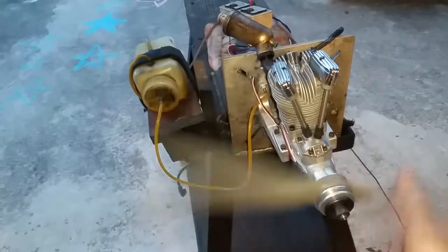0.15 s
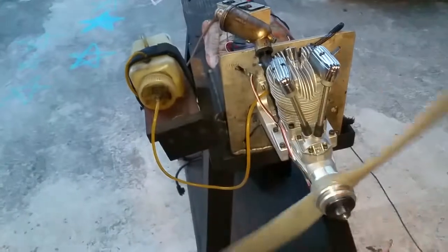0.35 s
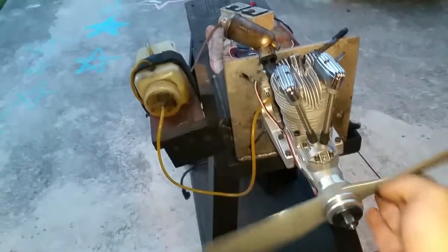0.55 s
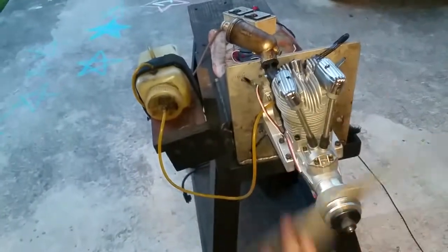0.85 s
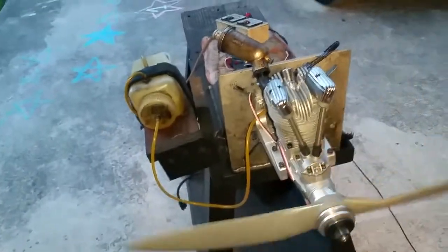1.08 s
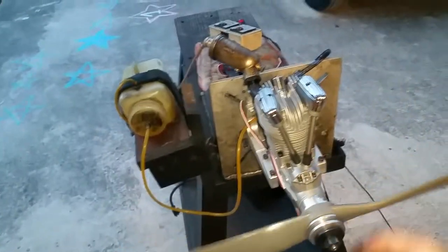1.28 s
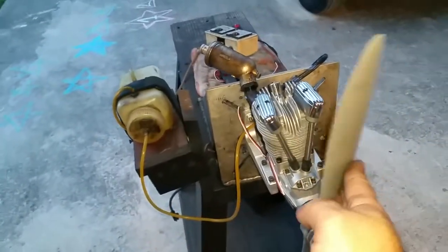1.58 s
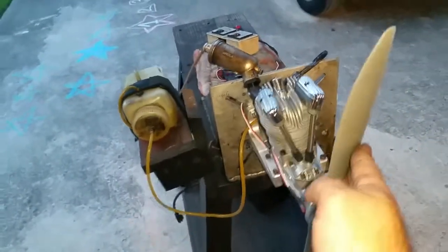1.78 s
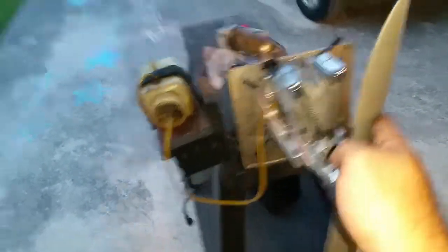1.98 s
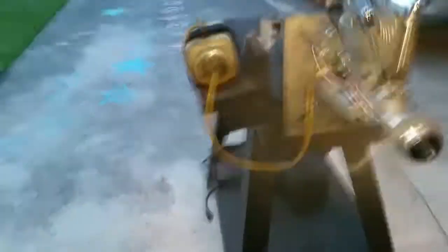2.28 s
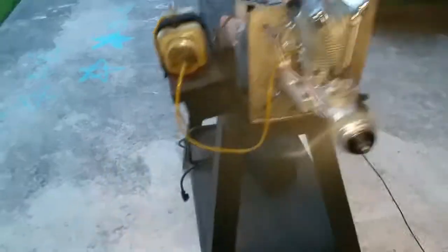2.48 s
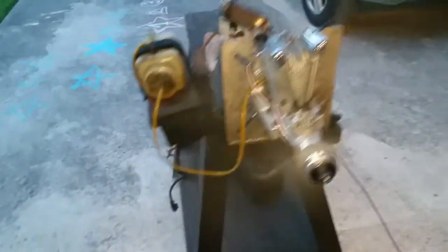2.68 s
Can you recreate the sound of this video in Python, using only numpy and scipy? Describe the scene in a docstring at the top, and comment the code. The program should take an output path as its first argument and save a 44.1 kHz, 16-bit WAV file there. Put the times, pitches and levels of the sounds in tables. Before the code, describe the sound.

A small four-stroke petrol engine, close, over soft low rumble and hiss. Hand turning gives airy wheezes at 0.27, 0.9 and 1.5 seconds, light clicks around 0.5, 0.9, 1.55 and 1.75, and a hollow knock near 1.04. After a short gulp at 2.14, it catches at 2.19: harsh, loud barks about fifteen per second, slightly uneven, with metallic clatter, propeller throb and short hard echoes to the end.

```python
"""Low rumble and hiss come first, then wheezes and clicks as a small four-stroke petrol engine for a model
aircraft is turned slowly by hand, close by: band-filtered noise under slow swells and short decays.
The engine then catches and idles unevenly. Each firing is a pressure pulse (crack), filtered noise (bark and
gas jet) and damped sines (exhaust thump, ringing metal), over rattling noise, valve taps and the throb of
the two-bladed propeller, a sinusoid locked to the engine cycle."""
import sys
import numpy as np
from scipy import signal
from scipy.fft import rfft, irfft
from scipy.io import wavfile
from scipy.ndimage import uniform_filter1d

SR = 44100
rng = np.random.default_rng(int(sys.argv[2]) if len(sys.argv) > 2 else 0)


def wav_record(signal):
    """Record a signal, one row per channel, as 16-bit PCM in the file named by sys.argv[1]."""
    frames = np.transpose(np.atleast_2d(signal))
    bounded = np.clip(frames, -1, 1)
    # unit amplitude maps onto the largest positive 16-bit level
    quanta = np.round(bounded * 32767).astype(np.int16)
    wavfile.write(sys.argv[1], SR, quanta)


N = 125685
T = np.arange(N) / SR
HZ = np.fft.rfftfreq(2 * N, 1 / SR)

# spectrum of the background rumble and hiss: pitch_hz, level_db
FLOOR_SPECTRUM = [(15, -33), (25, -15), (87, -3.5), (108, -3), (120, -7.5), (153, -3), (175, -8),
                  (236, -18), (256, -17.5), (309, -11.5), (451, -24), (1020, -25), (1560, -29.5),
                  (4250, -39), (8140, -15.5), (11000, -14), (16000, -37)]
FLOOR_DB = -48
# left-right correlation of the background: pitch_hz, correlation (1 = identical)
FLOOR_CORRELATION = [(30, 1), (300, 0.93), (1500, 0), (5000, 0), (16000, 0)]
# left-right correlation of the near sources: pitch_hz, correlation (1 = identical)
NEAR_CORRELATION = [(40, 0.45), (70, 0), (130, 0.93), (400, 0.99), (800, 0.88), (1500, 0.55), (2800, 0.21),
                    (5000, 0), (16000, 0)]
# balance of the engine: pitch_hz, left_minus_right_db
ENGINE_BALANCE = [(100, 2), (380, -1), (700, 1.5), (1300, 3.5), (2400, 4), (4400, -1.5), (6500, -2),
                  (9000, 3), (15000, -2.5)]
# balance of the wheezes and clicks: pitch_hz, left_minus_right_db
WHEEZE_BALANCE = [(60, 5), (150, 8), (380, -6.5), (950, 3.5), (2380, 6), (5980, -2.5), (15000, -1.0)]

# the hand shifts its grip on the propeller
GRIP_AT_S, GRIP_S, GRIP_DB, GRIP_HZ = 1.55, 0.23, -59.5, 230

# air wheezing through the turned engine: start_s, peak_s, level_db, rise_s, fall_s, tilt_db_per_octave
WHEEZES = [(0.102, 0.186, -48.5, 0.09, 0.037, -7), (0.224, 0.269, -32, 0.028, 0.053, -2),
           (0.313, 0.385, -55, 0.11, 0.089, -8.5), (0.671, 0.877, -44, 0.14, 0.037, -8),
           (.915, 0.953, -37.5, .014, 0.021, -3.5), (0.997, 1.054, -43.5, 0.03, 0.029, -8.5),
           (1.453, 1.509, -46, 0.021, 0.049, -5)]
# spectrum of the wheezes before tilting: pitch_hz, level_db
WHEEZE_SPECTRUM = [(120, -40), (200, -31), (310, -28.5), (600, -22), (1000, -18.5), (1770, -8.5),
                   (3250, -2.5), (3830, 1.5), (4680, -8.5), (5630, -4.5), (7410, -17.5), (16000, -23)]
WHEEZE_OPEN_S, WHEEZE_ROUGH_DB, WHEEZE_ROUGH_S = 0.017, 1.16, 0.0037
# clicks of valve gear and of the hand on the propeller: start_s, level_db, centre_hz, half_width_octaves
CLICKS = [(0.4737, -43, 3140, 0.9), (.596, -51, 3300, .9), (.609, -50, 4270, 0.74),
          (.8844, -37, 2920, 0.71), (1.4327, -53.5, 4000, 0.68), (1.5552, -41, 2270, 0.71),
          (1.7605, -38.5, 2150, 0.4), (1.822, -60.5, 2300, .3), (1.955, -63, 2500, 0.18),
          (2.132, -50, 5000, .6)]
CLICK_S, CLICK_BODY_DB = 0.0035, -13.5

# the intake gulps just before the first firing
GULP_AT_S, GULP_S, GULP_DB, GULP_HZ = 2.141, 0.052, -33, 183

# level of the propeller throb: time_s, level_db
THROB = [(2.1, -68), (2.15, -49), (2.185, -37), (2.27, -34.5), (2.36, -33), (2.44, -30), (2.51, -30),
         (2.62, -33.5), (2.7, -40), (2.78, -37), (2.85, -46)]
BLADE_PASSES = 4  # per engine cycle: two blades, two turns

# valve taps in each cycle: cycle_share, level_db
VALVES = [(0.348, -22), (0.428, -21), (.69, -36), (.85, -35)]
# spectrum of a valve tap: pitch_hz, level_db
VALVE_SPECTRUM = [(400, 1), (900, 6), (3000, -11.5), (5500, 1), (9000, -7.5), (16000, -9.5)]
VALVE_S, VALVE_SCATTER_S, VALVE_SCATTER_DB = 0.0025, 0.0012, 2

# level of the running clatter: time_s, level_db
CLATTER_LEVEL = [(2.11, -70), (2.138, -55), (2.15, -48), (2.172, -35), (2.185, -24.5), (2.3, -27),
                 (2.5, -25.5), (2.68, -25.5), (2.85, -25.5)]
# spectrum of the clatter: pitch_hz, level_db
CLATTER_SPECTRUM = [(59, -13), (100, -4), (570, -9), (930, -2.5), (1130, -13.5), (1420, -4), (1610, -11.5),
                    (2040, -6), (2370, -12), (3050, -6), (3620, -12.5), (6020, -17.5), (10500, -30.5),
                    (15000, -31), (16000, -33)]
# loudness of the clatter through one cycle: cycle_share, level_db
CYCLE = [(0, 0.5), (.15, 0.5), (.28, 0.5), (.4, 1.5), (.55, 2.5), (.7, 2), (.82, -4.5), (.92, -4)]
FLICKER_DB, FLICKER_S = 0.96, 0.0072
GRAINS_PER_S, GRAIN_SPREAD_DB, RUSH_GAIN = 4000, 3, 0.88
RATTLE_RING_DB, RATTLE_RING_LOW_HZ = -10, 593
# first rasp of the catching engine
RASP_AT_S, RASP_S, RASP_DB, RASP_HZ = 2.158, 0.011, -36, 1660

# modes of the engine and its stand: pitch_hz, level_db, t60_s
BODY_MODES = [(162.4, -14, 0.055), (287.8, -16.5, 0.12), (383.3, -24.5, 0.115), (455.3, -26, 0.24),
              (720, -31.5, 0.21), (885.4, -24, 0.078), (1250, -31.5, 0.12), (1463, -33, 0.047),
              (1780, -30, 0.082), (2034, -34.5, 0.34), (2494, -34.5, 0.12), (2930, -33, .1),
              (4264, -29, 0.033), (5580, -21, 0.017)]
BODY_DELAY_S = 0.004
# the piston knocks over compression: start_s, level_db, centre_hz
KNOCKS = [(.967, -31.5, 250), (.985, -26, 880), (1.04, -14, 814)]

# firings: time_s, crack_db, jet_db, thump_db
FIRINGS = [(2.1856, 4, 3, -2), (2.2616, -3.5, 5.5, -1), (2.3329, -1, 3.5, 0), (2.3967, -2, 3.5, -0.5),
           (2.4591, -1.5, 5, 0.5), (2.5212, -4.5, 2, 0), (2.5864, -2.5, 3.5, 1.5), (2.6527, -3.5, -5, -5.5),
           (2.7275, -3.5, 4, 0), (2.8034, -10, -0.5, -7.5)]
# levels below are relative to the firing's own; times count from the firing
CRACK_DB, CRACK_S, SUCK_DB, SUCK_AT_S, SUCK_S = -4, 0.00022, -17.5, 0.0025, 0.0021
BARK_DB, BARK_RISE_S, BARK_S = -12.5, 0.0012, 0.0037
# spectrum of the bark: pitch_hz, level_db
BARK_SPECTRUM = [(200, -8), (500, -0.5), (850, 1), (1100, -15.5), (1400, -0.5), (2100, -11), (3000, -14),
                 (6000, -17.5), (16000, -37)]
JET_DB, JET_AT_S, JET_S = -19.5, 0.0022, 0.0017
# spectrum of the gas jet: pitch_hz, level_db
JET_SPECTRUM = [(300, -20), (900, 14.5), (1500, 10), (2600, -13), (4000, 5), (5500, 4), (7000, -0.5),
                (8500, 1), (11000, -13), (16000, -7)]
THUMP_DB, THUMP_AT_S, THUMP_S, THUMP_HZ = -5.5, 0.00671, 0.0022, 214
# after-ring of the exhaust pipe, at its undrifted pitch
PIPE_ECHO_DB, PIPE_ECHO_S, PIPE_ECHO_HZ, PIPE_DECAY_S = -20.5, 0.00786, 344, 0.0049
LOW_CUT_HZ = 71

# near reflections among the parts of the engine, then later echoes from the concrete
METAL_DB, METAL_T60_S = -5, 0.046
ECHO_DB, ECHO_T60_S, ECHO_DELAY_S = -9.5, 0.12, 0.0062
EDGE_HZ = 16100


def amp(db):
    """Logarithmic level: decibels to amplitude ratio."""
    return 10 ** (np.asarray(db) / 20)


def unit(x):
    """Normalisation by mean power: scales to an rms of 1."""
    return x / np.sqrt(np.mean(x ** 2) + 1e-20)


def read(points):
    """Interpolation of a table on a logarithmic frequency axis."""
    f, value = np.transpose(points)
    return np.interp(np.log(HZ + 1), np.log(f + 1), value)


def level(points):
    """Envelope: a dB curve over time as gain, silent before its first point."""
    return amp(np.interp(T, *np.transpose(points))) * (T >= points[0][0])


def shape(x, db):
    """Linear filtering: multiplies the spectrum by a gain per frequency."""
    return irfft(rfft(x, 2 * N) * amp(db))[..., :N]


def band(hz, octaves):
    """Band-pass response in dB: 6 dB down at the given octaves to either side, then steep."""
    return -20 * np.log10(1 + (np.log2((HZ + 1) / hz) / octaves) ** 4)


def pair(x, correlation):
    """Coherence: mixes two unrelated channels as mid and side to a correlation per frequency."""
    a, b = rfft(x, 2 * N)
    c = np.clip(read(correlation), -1, 1)
    mid = a * np.sqrt((1 + c) / 2)
    side = b * np.sqrt((1 - c) / 2)
    return irfft(np.array([mid + side, mid - side]))[:, :N]


def noise(db, correlation=NEAR_CORRELATION):
    """Coloured noise: white stereo noise filtered to a spectrum, at an rms of 1."""
    return unit(shape(pair(rng.standard_normal((2, N)), correlation), db))


def place(x, balance):
    """Interchannel level difference: leans each band to the left or right."""
    return shape(x, read(balance) * np.array([[0.5], [-0.5]]))


def bell(at, width):
    """Gaussian pulse in time."""
    return np.exp(-((T - at) / width) ** 2)


def decay(at, length):
    """Exponential decay after a sudden start."""
    return (T >= at) * np.exp(-abs(T - at) / length)


def flicker(db, length):
    """Random amplitude modulation: a gain wavering by an rms of the given dB."""
    smooth = uniform_filter1d(rng.standard_normal(N), max(round(length * SR), 1))
    return amp(db * unit(smooth))


def cycles():
    """Engine phase: cycles counted from the first firing, extended by one cycle at both ends."""
    t = np.array(FIRINGS)[:, 0]
    t = np.r_[2 * t[0] - t[1], t, 2 * t[-1] - t[-2]]
    return np.interp(T, t, np.arange(len(t)) - 1)


def ring():
    """Modal superposition: engine and stand struck once; high modes differ in phase between the sides."""
    out, t = np.zeros((2, SR // 4)), T[:SR // 4]
    for (hz, db, t60), (start, *ears) in zip(BODY_MODES, rng.random((len(BODY_MODES), 3))):
        phase = start + np.array(ears)[:, None] * min(hz / 3000, 1)
        out += amp(db) * np.exp(-np.log(1000) * t / t60) * np.sin(2 * np.pi * (hz * t + phase))
    return out


def strike(at, db):
    """Impulse response of the body, placed in time."""
    return amp(db) * np.pad(ring(), ((0, 0), (round(at * SR), N)))[:, :N]


def echoes(x, db, t60, delay):
    """Diffuse reflection: convolution with sparse random taps that decay exponentially."""
    taps = rng.standard_normal((2, N)) * (rng.random((2, N)) < 3000 / SR)
    tail = pair(taps, NEAR_CORRELATION) * decay(delay, t60 / np.log(1000))
    return amp(db) * signal.fftconvolve(x, tail / np.linalg.norm(tail[0]), axes=1)[:, :N]


def background():
    """Stationary noise: low rumble and hiss."""
    return amp(FLOOR_DB) * noise(read(FLOOR_SPECTRUM), FLOOR_CORRELATION)


def grip():
    """Friction noise: faint dull rubbing of the hand on the propeller."""
    return amp(GRIP_DB) * bell(GRIP_AT_S, GRIP_S) * noise(band(GRIP_HZ, octaves=1.1))


def hand_turns():
    """Flow noise and impact: air wheezes through the unlit engine; valve gear and hand click."""
    out = np.zeros((2, N))
    octaves = np.log2(np.maximum(HZ, 200) / 2500)
    for start, at, db, rise, fall, tilt_db in WHEEZES:
        # rounded peak with exponential flanks
        swell = np.exp(1 - np.hypot(1, (T - at) / np.where(T < at, rise, fall) * 1.536))
        opening = np.clip((T - start) / WHEEZE_OPEN_S, 0, 1)
        out += amp(db) * swell * opening * noise(read(WHEEZE_SPECTRUM) + tilt_db * octaves)
    for at, db, hz, width in CLICKS:
        # a weaker, wider band an octave below gives the click body
        spectrum = np.maximum(band(hz, width), CLICK_BODY_DB + band(hz / 2, octaves=1.8))
        out += amp(db) * decay(at, CLICK_S) * noise(spectrum)
    return place(out * flicker(WHEEZE_ROUGH_DB, WHEEZE_ROUGH_S), WHEEZE_BALANCE)


def gulp():
    """Intake noise: a low suck of air as the engine is flung into its first firing."""
    return amp(GULP_DB) * decay(GULP_AT_S, GULP_S) * noise(band(GULP_HZ, octaves=0.46))


def propeller():
    """Blade-passing tone: a low throb phase-locked to the engine cycle."""
    return -np.sqrt(2) * level(THROB) * np.cos(2 * np.pi * BLADE_PASSES * cycles())


def valves():
    """Impact noise: the rockers tap near fixed phases of the cycle, scattered in time and level."""
    taps, turn = np.zeros(N), cycles()
    for k in range(len(FIRINGS)):
        for share, db in VALVES:
            late, strength = rng.standard_normal(2)
            at = np.searchsorted(turn, k + share) / SR + VALVE_SCATTER_S * late
            taps += amp(db + VALVE_SCATTER_DB * strength) * decay(at, VALVE_S)
    return taps * noise(read(VALVE_SPECTRUM))


def clatter():
    """Random excitation of resonances: rattle and rushing air modulated once per cycle, plus one rasp."""
    strength_db = GRAIN_SPREAD_DB * np.minimum(rng.exponential(1, N), 4)
    grains = (rng.random(N) < GRAINS_PER_S / SR) * amp(strength_db)
    rattle = unit(grains * rng.standard_normal((2, N)))
    rush = RUSH_GAIN * rng.standard_normal((2, N))
    drive = pair(rattle + rush, NEAR_CORRELATION)
    swell = level(CLATTER_LEVEL) * amp(np.interp(cycles(), *np.transpose(CYCLE), period=1))
    swell = swell * flicker(FLICKER_DB, FLICKER_S)
    ringing = signal.fftconvolve(drive, ring(), axes=1)[:, :N]
    ringing = shape(ringing, -20 * np.log10(1 + (RATTLE_RING_LOW_HZ / (HZ + 1)) ** 2))
    rasp = amp(RASP_DB) * bell(RASP_AT_S, RASP_S) * noise(band(RASP_HZ, octaves=0.18))
    direct = unit(shape(drive, read(CLATTER_SPECTRUM)))
    return swell * (direct + amp(RATTLE_RING_DB) * unit(ringing)) + rasp


def body():
    """Impulsive excitation: firings and the knocks of hand turning ring the engine and its stand."""
    fired = sum(strike(at + BODY_DELAY_S, thump_db) for at, _, _, thump_db in FIRINGS)
    knocked = sum(shape(strike(at, db), band(hz, octaves=0.81)) for at, db, hz in KNOCKS)
    return fired + knocked


def exhaust():
    """Pulsed gas discharge: a barking crack, suction with a gas jet, then the pipe's thump and after-ring."""
    out = np.zeros((2, N))
    gas, bark = noise(read(JET_SPECTRUM)), noise(read(BARK_SPECTRUM))
    drifts = rng.uniform(-1.3, 1, len(FIRINGS))
    for (at, crack_db, jet_db, thump_db), drift in zip(FIRINGS, drifts):
        t = T - at
        crack = amp(CRACK_DB) * bell(at, CRACK_S)
        suction = amp(SUCK_DB) * bell(at + SUCK_AT_S, SUCK_S)
        out += amp(crack_db) * (crack - suction)
        out += amp(BARK_DB + crack_db) * bark * np.exp(-abs(t) / np.where(t < 0, BARK_RISE_S, BARK_S))
        out += amp(JET_DB + jet_db) * gas * bell(at + JET_AT_S, JET_S)
        thump = bell(at + THUMP_AT_S, THUMP_S) * np.sin(2 * np.pi * THUMP_HZ * (t - THUMP_AT_S))
        out -= amp(THUMP_DB + thump_db) * thump
        pipe_hz = PIPE_ECHO_HZ * (1 + 0.18 * drift)
        after = decay(at + PIPE_ECHO_S, PIPE_DECAY_S) * np.sin(2 * np.pi * pipe_hz * (t - PIPE_ECHO_S))
        out -= amp(PIPE_ECHO_DB + thump_db) * after
    return shape(out, -10 * np.log10(1 + (LOW_CUT_HZ / (HZ + 1)) ** 6))


def scene():
    """Superposition: the engine with its reflections, the hand turning and the background."""
    firing, rattle = exhaust(), clatter() + valves()
    rattle = (rattle + echoes(rattle, METAL_DB, METAL_T60_S, 0)) / np.hypot(1, amp(METAL_DB))
    firing = firing + echoes(firing, ECHO_DB, ECHO_T60_S, ECHO_DELAY_S)
    engine = firing + body() + propeller() + rattle + gulp()
    return background() + grip() + hand_turns() + place(engine, ENGINE_BALANCE)


def record(dry):
    """Saturation and band limiting: clips at full scale, then low-passes."""
    lowpass = signal.firwin(255, EDGE_HZ, window=("kaiser", 9), fs=SR)
    return signal.oaconvolve(np.clip(dry, -1, 1), lowpass[None], "same", axes=1)


dry = scene()
out = record(dry)
wav_record(out)
```